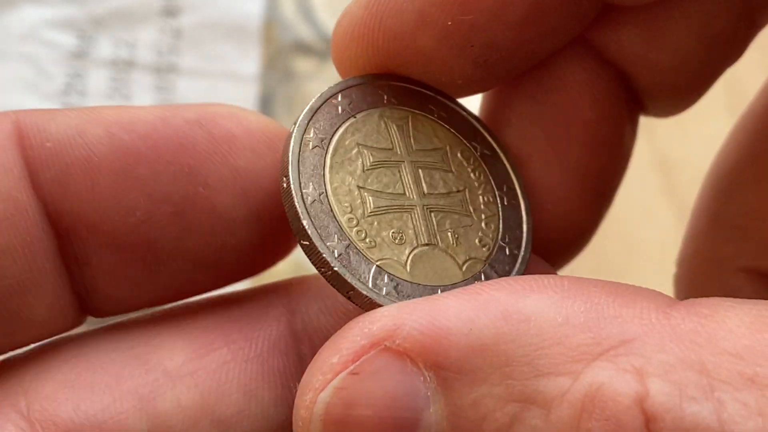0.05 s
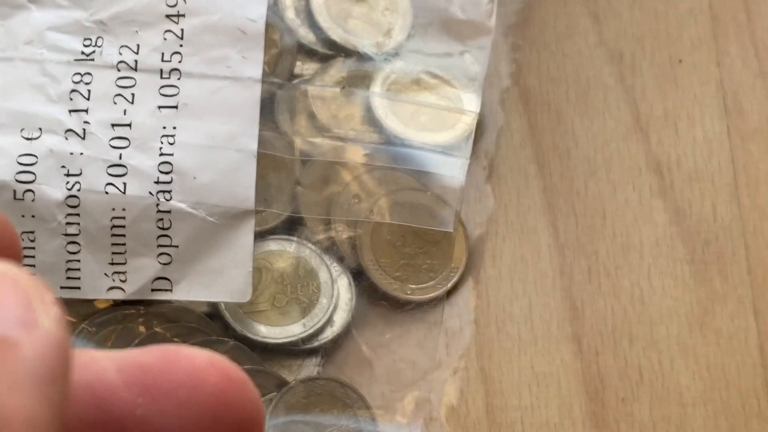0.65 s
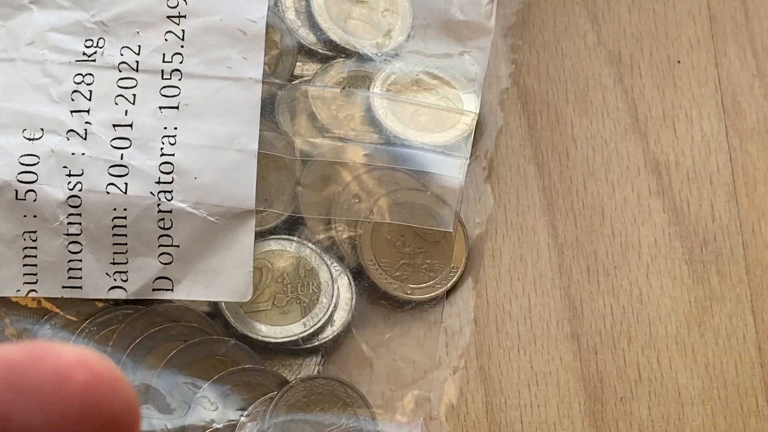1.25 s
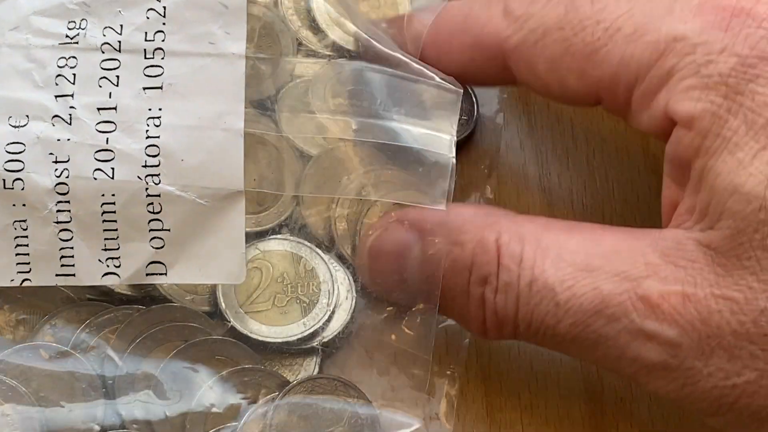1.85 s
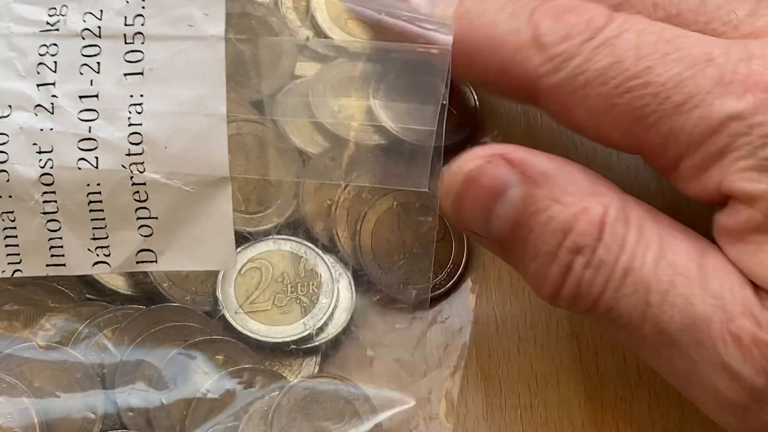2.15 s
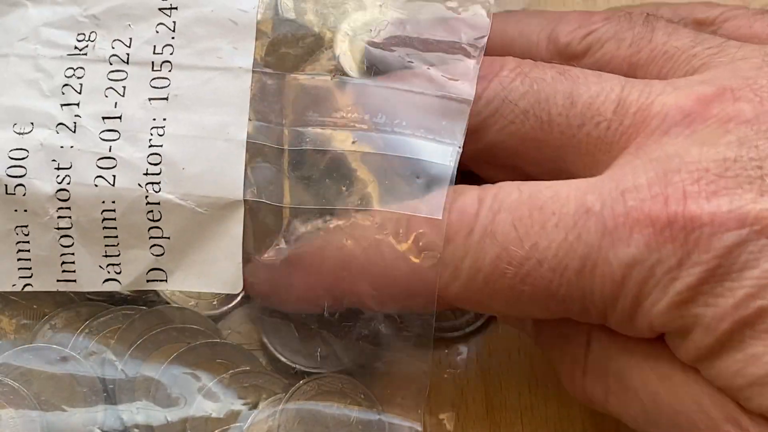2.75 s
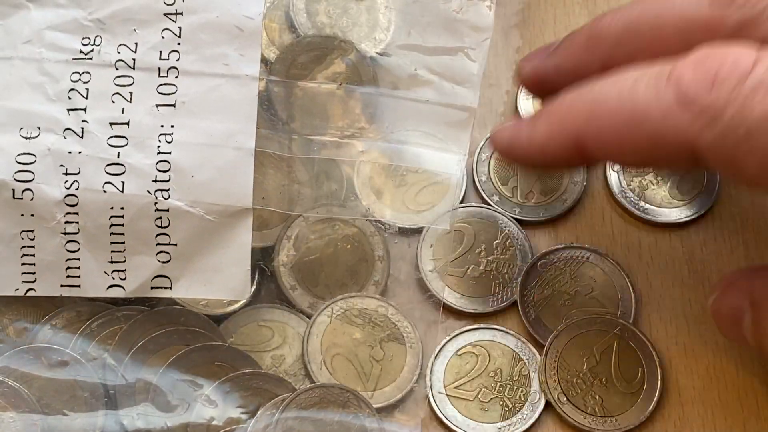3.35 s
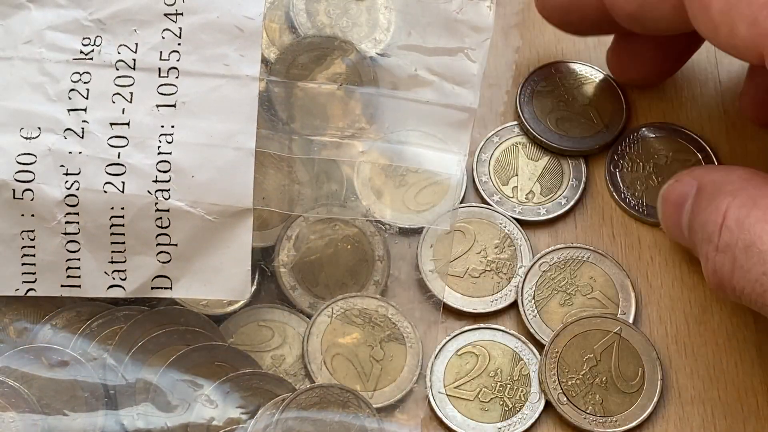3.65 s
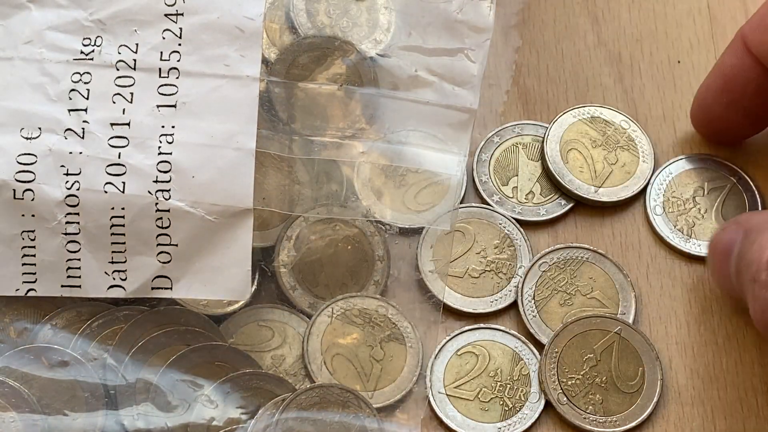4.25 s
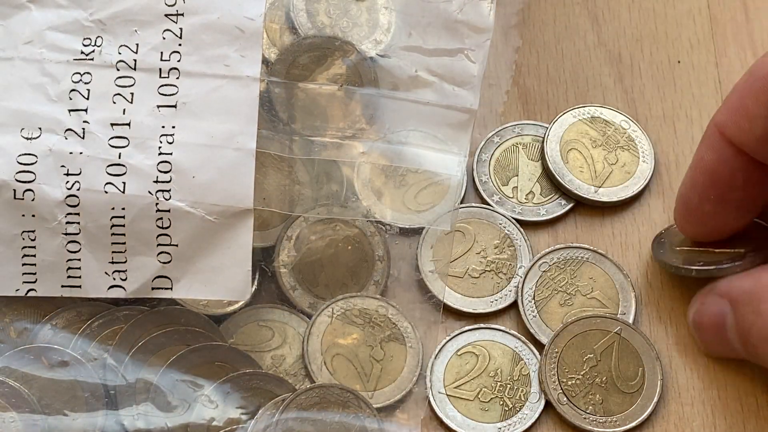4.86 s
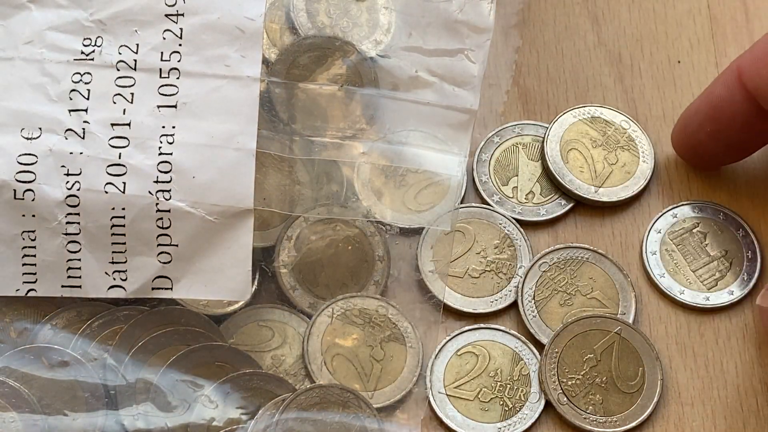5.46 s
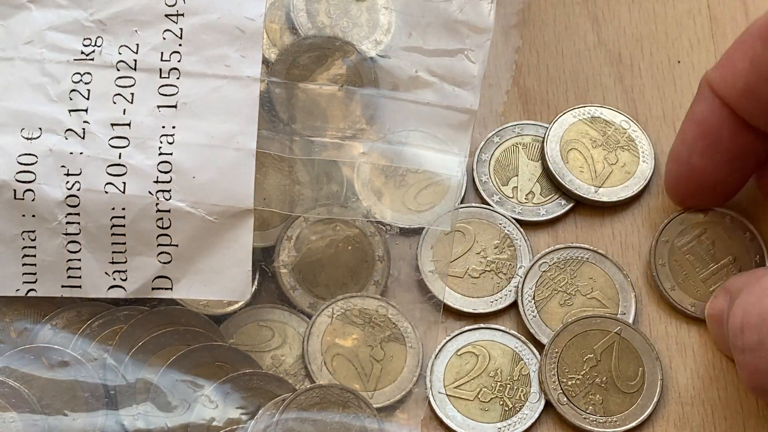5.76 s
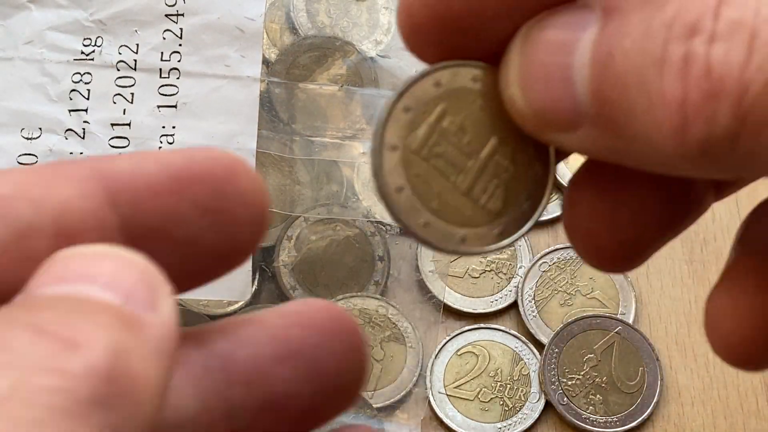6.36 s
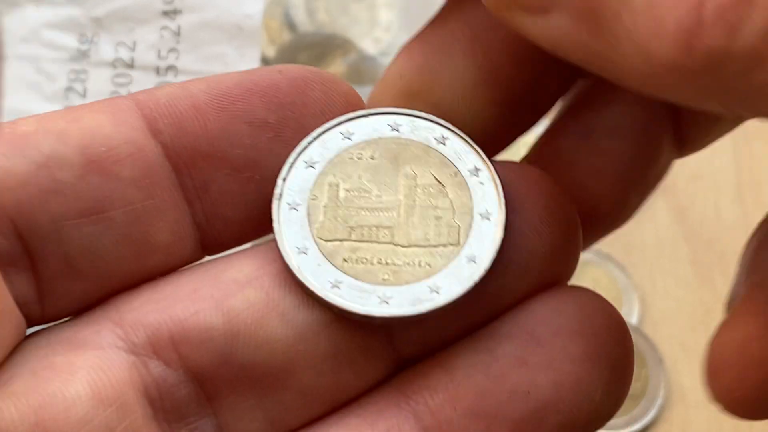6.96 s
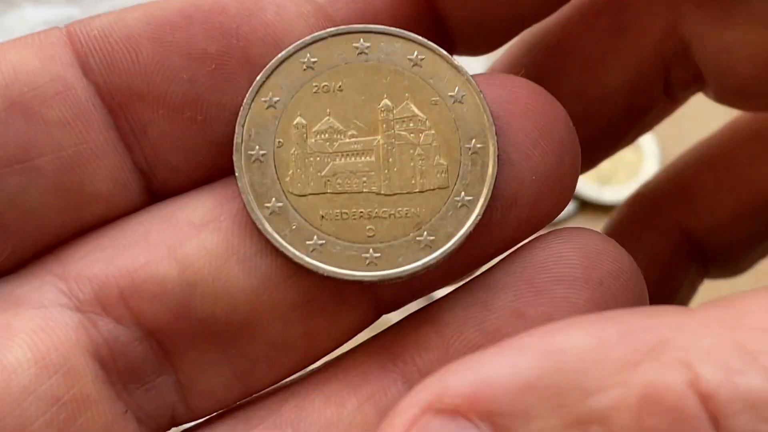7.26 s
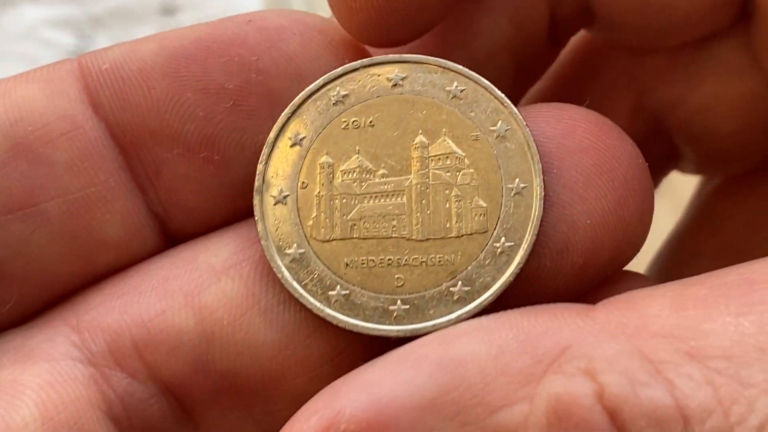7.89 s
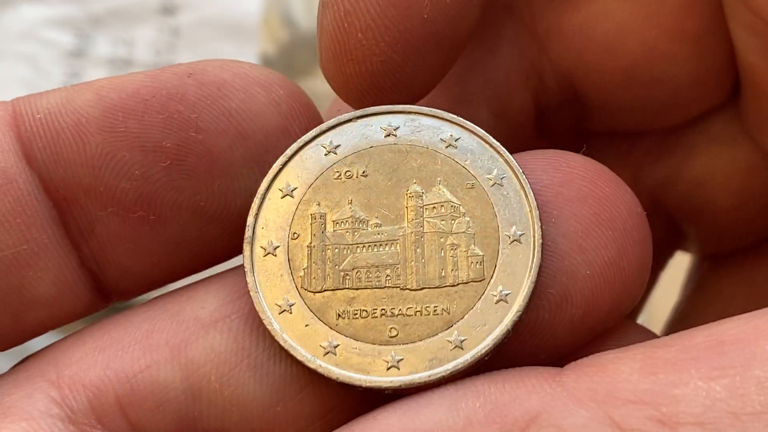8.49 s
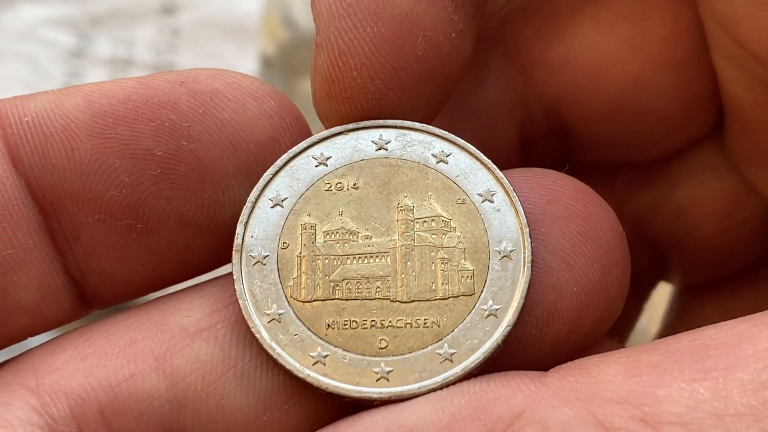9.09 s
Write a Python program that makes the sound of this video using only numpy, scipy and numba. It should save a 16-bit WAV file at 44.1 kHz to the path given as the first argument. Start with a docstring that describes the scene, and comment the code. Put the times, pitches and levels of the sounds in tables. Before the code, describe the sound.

Close up in a small, quiet room, a coin lands on a bag full of coins after a soft brush of skin. The plastic crinkles as a hand pulls out a clattering heap onto a wooden table. Light taps and scrapes follow, and a single coin rattles flat in ever faster, duller beats. A couple of faint clicks and a soft rub of fingers mark it being lifted.

```python
"""A wooden table in a small room, the stereo microphone close by. Fingers brush, then a coin drops
on a plastic bag full of coins and bounces. A hand crackles into the bag and rakes some out: rims
grind, coins clack together and the table top booms dully. One coin scrapes across the wood and is
tipped over; it wobbles to rest in ever faster, duller beats. As it is picked up, something on the
table rings faintly."""
import sys
import numpy as np
from scipy import signal
from scipy.fft import rfft, irfft, next_fast_len
from scipy.io import wavfile
from scipy.ndimage import map_coordinates
from numba import njit

SR = 44100
rng = np.random.default_rng(int(sys.argv[2]) if len(sys.argv) > 2 else 0)


def bounce(signal):
    """Save signal as a 16-bit WAV file at the path given by the first command-line argument."""
    frames = np.transpose(np.atleast_2d(signal))
    limited = np.clip(frames, -1, 1)
    pcm = np.round(limited * 32767).astype(np.int16)
    wavfile.write(sys.argv[1], SR, pcm)


N = 402633
TIME = np.arange(N) / SR
SIZE = 8192   # samples in one impulse response
BINS_HZ = np.arange(SIZE // 2 + 1) * SR / SIZE + 1

# Levels in all tables are relative; each source adds its own gain.
# Blows. Each row: start in seconds, level in dB, brightness in dB per octave, t60 in seconds.
DROP_BOUNCES = [(1.07, -9, -1, 0.012), (1.081, -11.5, -0.5, 0.0063), (1.087, -6.5, 0, 0.037),
                (1.104, 0, 3.5, 0.0075), (1.1305, -9, 1, 0.011), (1.134, -11.5, -2.5, .012),
                (1.149, -10, -1, 0.039), (1.162, -13, -3.5, 0.025)]   # a coin landing on the bag
PILE_KNOCKS = [(2.535, -11, -4, .035), (2.637, -14, 2.5, 0.041), (2.656, -20.5, 3, .022),
               (2.667, -13, 6, .029), (2.748, -15, -2, 0.027), (2.808, -3, -3, 0.011),
               (2.811, -6, 1.5, .05), (2.817, -2.5, 2.5, 0.014), (2.828, -9, -4.5, .04),
               (2.842, -13.5, -1, .025), (2.884, -17, 4.5, 0.036), (2.893, -14.5, -1, .019),
               (2.963, -25, 0.5, .02), (3.002, -20, 2, 0.019), (3.026, -17, -4, .015),
               (3.043, -13.5, -5, 0.022), (3.097, -14.5, -4.5, .047), (3.116, -2.5, -0.5, 0.03606),
               (3.124, -8, -1.5, .015), (3.151, -9.5, 2, 0.071), (3.162, -2.5, -0.5, .022),
               (3.176, -16.5, 0, .018)]   # the loudest knocks between coins
# Creases of the bag snap over. Each row: start in seconds, level in dB, brightness in dB per octave.
CREASE_SNAPS = [(1.577, -28.5, -3.5), (1.583, -30.5, 2), (1.617, -25, 1), (1.646, -32, -2),
                (2.033, -28, -3.5), (2.298, -22.5, -3.5), (2.3815, -12.5, 1.5), (2.421, -18, -0.5),
                (2.438, -12.5, 1.5), (2.4545, -11.5, 2.5), (2.568, -23.5, 8), (2.584, -18.5, 3.5)]
# Hand and bag drag on the table. Each row: start in seconds, length in seconds, level in dB.
TABLE_DRAGS = [(0.84, 0.2, -55.5), (1.57, .3, -60), (2.08, 0.16, -55), (2.27, 0.28, -52.5),
               (2.55, .4, -59.5), (3.2, 1.5, -76.5), (4.6, 0.3474, -65.5)]
# Resonances. Each row: frequency in Hz, width in Hz, lift in dB.
COIN_MODES = [(624, 70, 8), (940, 220, 5), (1510, 62, 6), (2130, 290, 3), (2580, 98, 5.5), (3037, 300, 8),
              (3350, 31, 5.5), (3922, 330, 6.5), (4060, 100.2, 0), (4970, 150, 2), (5900, 500, 2)]   # one coin lying on the wood
PILE_MODES = [(660, 110, 4.5), (890, 81, 3.5), (1650, 300, 1.5), (2020, 81, 0.5), (2590, 170, 3),
              (4430, 180, 4), (5100, 120, 4.5), (5660, 320, 2.5)]   # coins pressed together
# Broad spectra of the pile and the wobbling coin. Each row: frequency in Hz, level in dB.
PILE_SPECTRUM = [(120, -38.5), (200, -17.5), (330, -21.5), (660, -3.5), (1200, -3), (3400, -1.5),
                 (7100, -6.5), (9000, -17), (11000, -6), (16000, -25)]
WOBBLE_SPECTRUM = [(88, -57.5), (150, -28), (240, -23), (350, -26.5), (640, -15.5), (1340, -14), (2300, -3),
                   (3100, -5.5), (5700, -4.5), (8000, -16), (12000, -21.5), (16000, -26.5)]


def from_db(db):
    """Decibels to gain."""
    return 10 ** (np.asarray(db) / 20)


def unit(x):
    """Scale to an energy of one."""
    return x / np.sqrt(np.sum(x ** 2) + 1e-20)


def at_hz(points, hz=BINS_HZ):
    """Read a table on a log-frequency axis."""
    points = np.array(points)
    return np.interp(np.log(hz), np.log(points[:, 0]), points[:, 1])


def body(spectrum, modes=()):
    """Response in dB: a broad spectrum with resonance peaks on it."""
    peaks = sum(db / (1 + (2 * (BINS_HZ - hz) / width) ** 2) for hz, width, db in modes)
    return at_hz(spectrum) + peaks


def impulse(response_db):
    """The causal, minimum-phase ring that has this response."""
    cepstrum = irfft(np.log(from_db(response_db)))
    cepstrum[1:SIZE // 2] *= 2
    cepstrum[SIZE // 2 + 1:] = 0
    return irfft(np.exp(rfft(cepstrum)))


def through(x, ring):
    """Play a sound through an impulse response."""
    return signal.oaconvolve(x, ring)[:len(x)]


def grains(per_s, spread_db):
    """Random tiny slips of uneven size, at most one a sample; rms one."""
    sizes = from_db(spread_db * np.minimum(rng.exponential(1, N), 4)) * rng.choice([-1, 1], N)
    return unit(sizes * (rng.random(N) < per_s / SR)) * np.sqrt(N)


def friction(response_db, per_s, spread_db):
    """A steady stream of tiny slips rings a body; rms about one."""
    return through(grains(per_s, spread_db), unit(impulse(response_db)))


@njit
def moving_highpass(x, hz, damping):
    """A resonant high-pass whose corner follows a curve."""
    out, low, band = np.zeros(len(x)), 0., 0.
    for i in range(len(x)):
        step = 2 * np.sin(np.pi * hz[i] / SR)
        low += step * band
        out[i] = x[i] - low - damping * band
        band += step * out[i]
    return out


def stroke(start_s, length_s, peak_at=.5, sharpness=1):
    """Gain of one movement: it speeds up, peaks at a share of its length and slows to rest."""
    gain = np.zeros(N)
    moving = slice(*np.searchsorted(TIME, [start_s, start_s + length_s]))
    phase = np.interp((TIME[moving] - start_s) / length_s, [0, peak_at, 1], [0, np.pi / 2, np.pi])
    gain[moving] = np.sin(phase) ** sharpness
    return gain


def strokes(rows, peak_at, sharpness):
    """Gain of a series of movements of one shape."""
    return sum(from_db(db) * stroke(s, length, peak_at, sharpness) for s, length, db in rows)


def surges(events, lead_s, fade_s):
    """Gain that swells toward each blow and dies away after it."""
    gain, age = np.zeros(N), (np.arange(2 * SIZE) - SIZE) / SR
    shape = np.exp(-np.maximum(-age / lead_s, age / fade_s))
    for s, db, *_ in events:
        near = slice(int(s * SR) - SIZE, int(s * SR) + SIZE)
        gain[near] = np.maximum(gain[near], from_db(db) * shape)
    return gain


def with_decay(events, t60, by_db=0):
    """Give blows one decay time and shift their level."""
    return [(s, db + by_db, brightness, t60) for s, db, brightness, *_ in events]


def blows(events, response_db, rise_s, gain_db, tilt_from_hz=1000, scatter_db=-23, scatter_t60=.096):
    """Each blow is a brief chatter of contacts that rings the body; close surfaces scatter it back."""
    out, age = np.zeros(N + SIZE), np.arange(SIZE) / SR
    octaves = np.log2(np.clip(BINS_HZ, tilt_from_hz, 12000) / tilt_from_hz)
    scattered = from_db(scatter_db - 60 * age / scatter_t60)
    for s, db, brightness, t60 in events:
        dying = from_db(-60 * np.maximum(age - rise_s, 0) / t60)
        chatter = rng.standard_normal(SIZE) * np.minimum(age / rise_s, 1) * np.hypot(dying, scattered)
        ring = through(chatter, impulse(response_db + brightness * octaves))
        at = int(s * SR)
        out[at:at + SIZE] += from_db(db + gain_db) * unit(ring)
    return out[:N]


def room_tone(rumble_db=-60, swing_db=1.6, changes_per_s=4, shake_db=4, air_db=-80, split_hz=250):
    """A slowly wandering rumble, swelling when the table is handled, under faint steady air."""
    # The quiet room. Each row: frequency in Hz, level in dB.
    spectrum = [(22, -45), (31, -22.5), (42, -0.5), (62, 3.5), (77, -5), (113, -16.5), (142, -23),
                (222, -36.5), (350, -42), (560, -44), (1330, -56), (2200, -56.5), (7100, -61.5),
                (12500, -65.5), (16000, -76)]
    noise = through(rng.standard_normal(N + SIZE), impulse(body(spectrum)))
    crossover = [signal.butter(4, split_hz, kind, fs=SR, output="sos") for kind in ("low", "high")]
    rumble, air = (unit(signal.sosfilt(sos, noise)[SIZE:]) for sos in crossover)
    wander = map_coordinates(rng.standard_normal(128), [TIME * changes_per_s], order=1, mode="wrap")
    shake = from_db(shake_db) * strokes(TABLE_DRAGS, peak_at=.48, sharpness=.98)
    swell = np.hypot(from_db(rumble_db + swing_db * wander), shake)
    return np.sqrt(N) * (rumble * swell + air * from_db(air_db))


def room_reverb(x, wet_db=-8, first_echo_s=.0046):
    """The near walls leave a short tail that dies band by band."""
    # Reverberation time. Each row: frequency in Hz, t60 in seconds.
    decay_times = [(200, 0.33), (550, 0.41), (1400, 0.35), (3700, 0.42), (9700, .34), (16000, 0.13)]
    # What the walls send back. Each row: frequency in Hz, level in dB.
    wall_return = [(100, -2), (400, -5), (1000, -4), (3000, -7), (6000, -9), (10000, -9), (16000, -8.5)]
    age = np.arange(SR * 3 // 4) / SR
    edges_hz = np.geomspace(60, 18000, 10)
    tail = 0
    for low, high in zip(edges_hz, edges_hz[1:]):
        bandpass = signal.butter(3, [low, high], "band", fs=SR, output="sos")
        band = signal.sosfilt(bandpass, rng.standard_normal(len(age)))
        tail = tail + band * from_db(-60 * age / at_hz(decay_times, np.sqrt(low * high)))
    echoes = through(unit(tail * (age > first_echo_s)), impulse(body(wall_return)))
    return from_db(wet_db) * through(x, echoes)


def fingers(gain_db=-1):
    """Dry skin brushes over skin and metal with a soft, smooth hiss."""
    # Finger movements. Each row: start in seconds, length in seconds, level in dB.
    brushes = [(0.34, 0.46, -61.5), (0.83, 0.14, -67), (1.2, 0.42, -69), (1.76, 0.084, -61),
               (4.72, 0.17, -62.5), (5.77, 0.52, -67.5), (6.51, .08, -83), (6.74, 0.31, -76)]
    # Skin hiss. Each row: frequency in Hz, level in dB.
    spectrum = [(500, -31), (1000, -10), (1800, -8), (2700, -3), (7300, -4.5), (9000, -6.5), (16000, -10.5)]
    hiss = friction(body(spectrum), per_s=SR, spread_db=4)
    return from_db(gain_db) * hiss * strokes(brushes, peak_at=.6, sharpness=1.2)


def table_top(boom_t60=.061):
    """The board answers bumps, dragging and the blows above it with a dull boom."""
    # Bag and hand bump it. Each row: start in seconds, level in dB, brightness in dB per octave.
    thumps = [(0.840, -30.5, 1), (0.965, -43, -4), (1.615, -41.5, -3), (1.66, -41.5, -9), (1.755, -39, 5),
              (2.089, -32.5, 6), (2.127, -46.5, 2), (2.165, -33.5, 1), (2.536, -42.5, 5.5),
              (2.81, -39, 2.5)]
    # The boom. Each row: frequency in Hz, level in dB.
    spectrum = [(40, -16), (80, -1.5), (140, -3.5), (250, -6), (350, -4), (480, -21), (900, -24.5),
                (3000, -66.5)]
    # Bending of the board. Each row: frequency in Hz, width in Hz, lift in dB.
    bending_modes = [(153, 16, 3.5), (227, 13, 4.5), (350, 71, 1.5)]
    board = body(spectrum, bending_modes)
    dragging = strokes(TABLE_DRAGS, peak_at=.48, sharpness=.8) * friction(board, per_s=500, spread_db=3)
    bumps = []
    for events, by_db in (thumps, 0), (DROP_BOUNCES, -25), (CREASE_SNAPS, -25), (wobble_beats(), -43):
        bumps += with_decay(events, boom_t60, by_db)
    return dragging + blows(bumps, board, rise_s=.0044, gain_db=20, tilt_from_hz=100)


def plastic_bag():
    """The plastic crackles finely, and now and then a crease snaps."""
    # Fingers push into the bag. Each row: start in seconds, length in seconds, level in dB.
    pushes = [(1.565, 0.1, -50), (1.75, 0.12, -58.5), (1.88, 0.22, -57.5), (2.11, 0.08, -45.5),
              (2.19, .08, -66.5), (2.255, .12, -52), (2.35, .17, -52), (2.52, 0.47, -40), (2.93, .27, -54)]
    # Spectra of the plastic. Each row: frequency in Hz, level in dB.
    crackle_spectrum = [(120, -37.5), (200, -9.5), (340, -2.5), (700, -7), (1000, 1), (2500, -9),
                        (5500, -14.5), (7200, -15), (11000, -18.5), (16000, -22)]
    snap_spectrum = [(240, -31.5), (400, -12.5), (1200, -8), (3200, -13), (5100, -9.5), (10400, -10.5),
                     (16000, -19)]
    crackle = friction(body(crackle_spectrum), per_s=4200, spread_db=4.4)
    snaps = blows(with_decay(CREASE_SNAPS, t60=.022), body(snap_spectrum), rise_s=.00024, gain_db=8)
    return crackle * strokes(pushes, peak_at=.55, sharpness=.9) + snaps


def lifted_coin():
    """A fingertip tips the coin off the wood, and something on the table rings faintly."""
    # Finger touches. Each row: start in seconds, level in dB, brightness in dB per octave.
    lifts = [(4.375, -50, -18), (4.394, -51.5, -2), (5.616, -37, -0.5), (5.860, -35, -3.5)]
    # The click of the lift. Each row: frequency in Hz, level in dB.
    spectrum = [(300, -39), (650, -14), (1200, -17), (2200, -1), (3200, -6), (4000, -7.5), (5500, -19),
                (16000, -42)]
    # A faint lasting ring from something on the table. Each row: frequency and width in Hz, lift in dB.
    modes = [(2110, 10, 8.5), (2322, 14, 1), (3020, 90, 7)]
    return blows(with_decay(lifts, t60=.029), body(spectrum, modes), rise_s=.00246, gain_db=16.5)


def tapped_coins():
    """Single coins tap lightly; lying flat or held, they are damped at once."""
    # Light contacts. Each row: start in seconds, level in dB, brightness in dB per octave.
    taps = [(0.838, -39, 5), (1.7435, -28.5, 0.5), (1.757, -32.5, -1.5), (1.992, -37, -29),
            (2.091, -25, -0.5), (2.1265, -29, -10), (3.699, -27, 2), (3.719, -21.5, 3.5), (3.809, -21, 2),
            (3.901, -27.5, 0), (3.939, -28, -5.5), (4.058, -53.5, 6), (4.34, -48.5, -1.5),
            (4.568, -17, 1.5), (4.592, -25.5, -2.5)]
    # A tap. Each row: frequency in Hz, level in dB.
    spectrum = [(180, -49.5), (300, -23), (900, -0.5), (2000, -0.5), (3000, -6.5), (6600, -13),
                (9000, -32.5), (12000, -28), (16000, -39)]
    return blows(with_decay(taps, t60=.018), body(spectrum, COIN_MODES), rise_s=.0012, gain_db=13.5)


def coin_motion(flat_hz=2800, open_hz=570):
    """Gain of a moving coin and pitch of the gap under it: steady in a slide, falling in a tilt."""
    # Slides and rolls. Each row: start in seconds, length in seconds, level in dB, gap pitch in Hz.
    slides = [(3.411, 0.23, -66, 750), (3.689, 0.11, -43, 750), (3.755, .185, -35, 861.6),
              (3.91, 0.094, -54, 900), (4.365, 0.066, -60, 2200), (4.422, 0.078, -57, 2250),
              (4.64, .28, -60.5, 800), (4.684, 0.029, -40.5, 800), (4.867, 0.056, -46, 907.5),
              (4.906, 0.039, -41.5, 2206), (4.926, .2, -45.5, 1900), (5.07, .16, -40, 1600),
              (5.578, .05, -56.5, 852), (5.763, 0.06, -53.5, 2130)]
    # The coin is levered up on its rim. Each row: start in seconds, length in seconds, level in dB.
    tilts = [(4.533, .104, -33), (5.833, .037, -51.5)]
    moves = [(from_db(db) * stroke(s, length), hz) for s, length, db, hz in slides]
    for s, length, db in tilts:
        opened = np.clip((TIME - s) / length, 0, 1)
        gain = from_db(db) * stroke(s, length, peak_at=.9, sharpness=1.05)
        moves.append((gain, flat_hz * (open_hz / flat_hz) ** opened))
    level = sum(gain for gain, hz in moves)
    gap_hz = sum(gain * hz for gain, hz in moves) / (level + 1e-12)
    return level, np.maximum(gap_hz, open_hz)


def sliding_coin(gain_db=-1):
    """Slips on the wood grain ring the coin and the gap under it; little passes below the gap's pitch."""
    # Metal scraping on wood. Each row: frequency in Hz, level in dB.
    spectrum = [(200, -4.5), (500, 8), (1000, -1.5), (2000, 1.5), (3200, -3.5), (5000, -7.5), (7000, -18),
                (11000, -23.5), (16000, -36)]
    level, gap_hz = coin_motion()
    slips = moving_highpass(grains(per_s=5600, spread_db=2), gap_hz, damping=.3)
    slips = moving_highpass(slips, .65 * gap_hz, damping=1.3)
    scrape = np.sqrt(N) * unit(through(slips, impulse(body(spectrum, COIN_MODES))))
    return from_db(gain_db) * level * scrape


def raked_pile(start_s=2.53, end_s=3.19, ramp_s=.012, grind_db=-2, clink_db=-3):
    """Milled rims grind over the table, and sparser small clinks pass between the coins."""
    # Grinding rims. Each row: frequency in Hz, level in dB.
    spectrum = [(88, -51.5), (150, -16.5), (400, -8.5), (900, 2.5), (1100, -0.5), (6000, -15.5),
                (9000, -19.5), (10600, -10), (16000, -26.5)]
    grinding = friction(body(spectrum, PILE_MODES), per_s=3900, spread_db=.5)
    clinks = friction(body(PILE_SPECTRUM, PILE_MODES), per_s=220, spread_db=4)
    # One slightly growing pull drags the pile; every knock shoves it on for a moment.
    pull = np.interp(TIME, [start_s, start_s + ramp_s, end_s - ramp_s, end_s], [0, 1, from_db(2.5), 0])
    shoves = surges(PILE_KNOCKS, lead_s=.005, fade_s=.018)
    effort = np.hypot(from_db(-43.5) * pull, from_db(-20.5) * shoves)
    return effort * (from_db(grind_db) * grinding + from_db(clink_db) * clinks)


def wobble_beats(start_s=4.9215, gap_s=.0648, gap_kept=.92, gap_loss_s=.0046, count=9):
    """A tipped coin beats ever faster. Each row: start in seconds, level in dB, dB per octave."""
    beats, s = [], start_s
    for done in np.linspace(0, 1, count):
        db = -.5 - 17 * done ** 2.2   # the strength holds, then collapses
        brightness = 1.6 - 2.52 * done
        beats.append((s, db, brightness))
        s += gap_s
        gap_s = gap_kept * gap_s - gap_loss_s
    return beats


def rolling_rim(gain_db=-20):
    """The wobbling coin rolls on its rim, swelling toward each beat after the first."""
    swell = surges(wobble_beats()[1:], lead_s=.0025, fade_s=.0022)
    rolling = friction(body(WOBBLE_SPECTRUM, COIN_MODES), per_s=10000, spread_db=1.5)
    return from_db(gain_db) * swell * rolling


def wobbling_coin():
    """The rim strikes the wood again and again as the coin settles on its face."""
    beats = with_decay(wobble_beats(), t60=.014)
    return blows(beats, body(WOBBLE_SPECTRUM, COIN_MODES), rise_s=.0019, gain_db=12)


def clacking_pile():
    """Coins knock together in the raked pile and are damped at once."""
    return blows(PILE_KNOCKS, body(PILE_SPECTRUM, PILE_MODES), rise_s=.0016, gain_db=9.5)


def dropped_coin():
    """A coin lands on the bag and bounces, briefly ringing the pile inside."""
    # The impact. Each row: frequency in Hz, level in dB.
    spectrum = [(240, -25), (400, -18.5), (504, -17.5), (920, -4), (1270, -7.5), (2550, -1), (3470, -2),
                (5600, -1), (7600, -7.5), (12000, -14), (16000, -26.5)]
    return blows(DROP_BOUNCES, body(spectrum, PILE_MODES), rise_s=.00023, gain_db=12)


def scene(scatter_t60=.053):
    """The coins are close and straight ahead of the microphone; scattered sound widens the mids."""
    # Stereo width. Each row: frequency in Hz, gain of the side signal in dB.
    width = [(40, -21.5), (150, -13), (350, -8), (700, -4.5), (1400, -3.5), (2200, -13.5), (6000, -24.5),
             (11000, -16)]
    hits = dropped_coin() + clacking_pile() + wobbling_coin() + tapped_coins() + lifted_coin()
    direct = hits + rolling_rim() + table_top() + plastic_bag() + raked_pile() + sliding_coin()
    direct += fingers()
    mid = direct + room_reverb(direct) + room_tone()
    scatter = unit(rng.standard_normal(SIZE) * from_db(-60 * TIME[:SIZE] / scatter_t60))
    diffuse = from_db(-4) * through(direct, scatter) + from_db(.5) * room_reverb(direct) + room_tone()
    side = through(diffuse, impulse(body(width)))
    return np.array([mid + side, mid - side])


def record(dry, lag_from_hz=7080, lag_to_hz=15600, hz_per_turn=4260, ceiling=.88, cutoff_hz=16000):
    """The microphone's left port is louder in the mids and lags in the treble; peaks and top are cut."""
    # Balance of the ports. Each row: frequency in Hz, left over right in dB.
    balance = [(150, 0), (600, 0.5), (1200, 2.5), (2200, -0.5)]
    size = next_fast_len(N + SIZE)
    hz = np.arange(size // 2 + 1) * SR / size
    sides = np.array([[1], [-1]])
    lag = 2 * np.pi * (np.clip(hz, lag_from_hz, lag_to_hz) - lag_from_hz) / hz_per_turn
    response = from_db(.5 * sides * at_hz(balance, hz + 1)) * np.exp(-.5j * lag * sides)
    ports = irfft(rfft(dry, size) * response, size)[:, :N]
    lowpass = signal.ellip(10, .2, 80, cutoff_hz, fs=SR, output="sos")
    return signal.sosfilt(lowpass, np.clip(ports, -ceiling, ceiling))


dry = scene()
out = record(dry)
bounce(out)
```